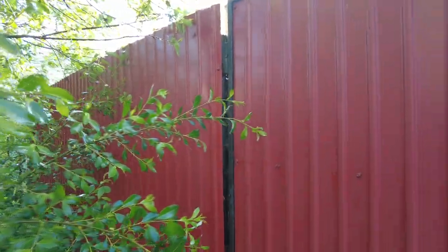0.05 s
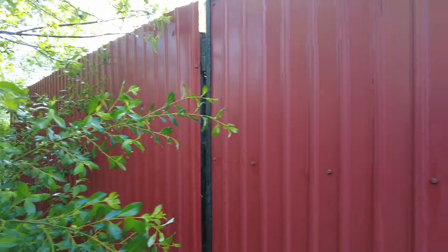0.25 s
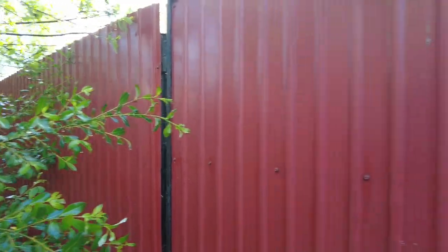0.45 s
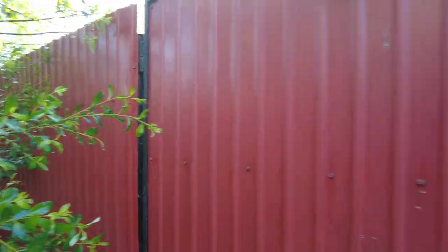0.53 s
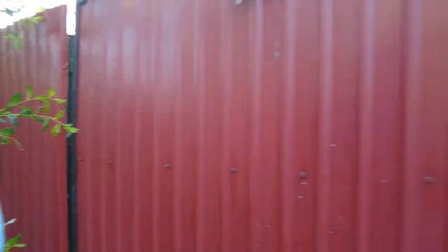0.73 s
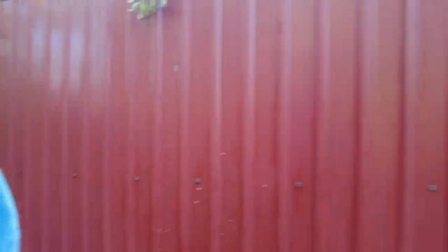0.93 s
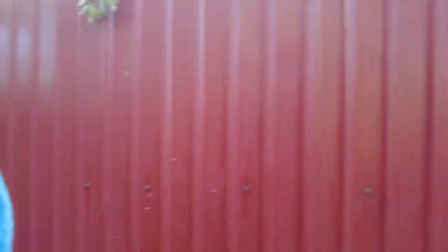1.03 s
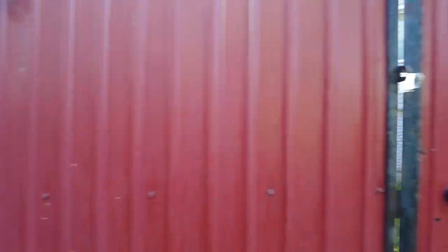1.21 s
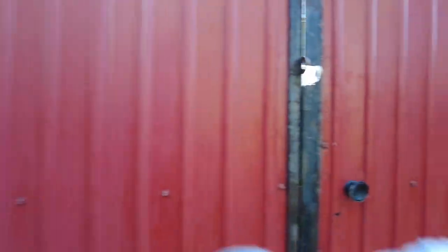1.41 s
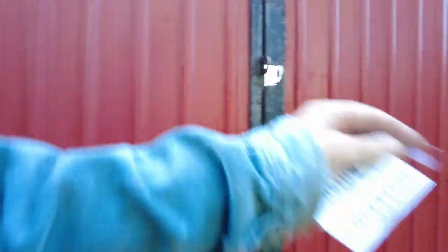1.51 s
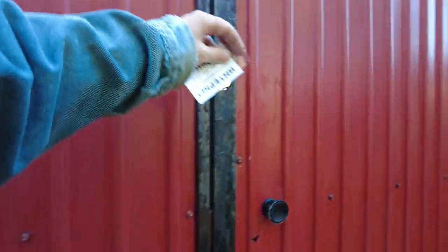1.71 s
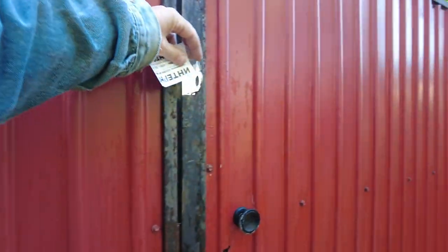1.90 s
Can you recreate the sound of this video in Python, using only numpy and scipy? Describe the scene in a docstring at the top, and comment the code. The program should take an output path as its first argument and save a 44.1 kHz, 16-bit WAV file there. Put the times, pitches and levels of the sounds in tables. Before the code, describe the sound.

A jacket rubs close against a phone microphone in one short rasp, then soft footfalls and gravel clicks

```python
"""A dirt path by a quiet garden: someone walks along it, phone in hand. Something, probably the jacket, catches
close to the right microphone port and slips free in one short rasp of stick-slip hiss, kicks and squeak.
Soft footfalls and bumps (damped thuds), gritty rustling (dense coloured grains) and sharp clicks of gravel
(short resonances) follow. Low noise makes the air that buffets the phone as an arm swings up, and faint
wavering hiss makes the garden."""
import sys
import numpy as np
from scipy import signal
from scipy.fft import rfft, irfft
from scipy.io import wavfile
from scipy.ndimage import uniform_filter1d

SR = 44100
rng = np.random.default_rng(int(sys.argv[2]) if len(sys.argv) > 2 else 0)


def dump_mix(stems):
    """Bounce the given channels to the path in sys.argv[1] as a 16-bit WAV at rate SR."""
    frames = np.atleast_2d(stems).T  # one column per channel
    limited = np.clip(frames, -1, 1)  # hard clip at full scale
    pcm = np.round(limited * 32767).astype(np.int16)
    wavfile.write(sys.argv[1], SR, pcm)


N = 85995

# spectrum of gritty rustle, also the grit on top of each bump: f/Hz, relative level/dB
GRIT_COLOUR = [(300, -10.5), (2300, -6.5), (3000, 1.5), (4400, 0.5), (6000, -2.5), (7200, -5), (10500, -6),
               (13000, -12.5), (16000, -12.5)]


def amp(db):
    """Decibels to gain."""
    return 10 ** (np.asarray(db) / 20)


def unit(x):
    """Scale to rms 1."""
    return x / np.sqrt(np.mean(x ** 2))


def curve(rows):
    """Gain over time, drawn straight in dB through (t/s, level/dB) points."""
    return amp(np.interp(np.arange(N) / SR, *np.array(rows).T))


def gains(points):
    """Gain at each frequency from (f/Hz, level/dB) points, interpolated over log frequency."""
    hz, db = np.array(points).T
    bin_hz = np.arange(N // 2 + 1) * SR / N
    return amp(np.interp(np.log(bin_hz + 1), np.log(hz), db))


def colour(x, points):
    """Give a sound a spectrum, at rms 1."""
    return unit(irfft(rfft(x) * gains(points), N))


def ring(x, hz, width_hz):
    """One damped resonance: a two-pole bandpass."""
    w = 2 * np.pi * min(hz, SR / 2 - 1) / SR
    a = np.sin(w) * width_hz / hz / 2
    return signal.lfilter([a, 0, -a], [1 + a, -2 * np.cos(w), 1 - a], x)


def noise():
    """White noise."""
    return rng.standard_normal(N)


def smooth_twice(x, size):
    """Slow random drift: two moving averages, at rms 1."""
    return unit(uniform_filter1d(uniform_filter1d(x, size=size), size=size))


def grains(spread_db):
    """Dense tiny impacts of random sign and uneven size, whose strength swells in flurries."""
    grains_per_s, flicker_db = 5000, 3.5
    flurry = smooth_twice(noise(), 400)
    size = np.minimum(rng.exponential(size=N), 4)
    hits = rng.random(N) < grains_per_s / SR
    return np.sign(noise()) * hits * amp(spread_db * size + flicker_db * flurry)


def ports(x, scattered, spread):
    """A sound from the right reaches the left port later and duller, its treble partly scattered."""
    # shading of the left port from sounds on the right: f/Hz, level/dB
    shade = [(60, -1.5), (1400, 2.5), (2600, 0), (4400, -9.5), (8100, -11.5), (15000, -26.5)]
    # how late they reach it: f/Hz, delay/s
    port_lag = [(100, .00025), (450, .0006), (1100, .00058), (1350, .00016), (1850, .00016),
                (2200, .000225), (2600, .000195), (6000, .00016)]
    scatter_hz, scatter_edge_hz = 3100, 350
    hz = np.arange(N // 2 + 1) * SR / N
    lag_s = np.interp(hz, *np.array(port_lag).T)
    share = np.clip(spread, 0, 1) * (1 + np.tanh((hz - scatter_hz) / scatter_edge_hz)) / 2
    right = rfft(x)
    # the power stays the same while scattered sound replaces direct sound
    left = np.sqrt(1 - share ** 2) * right + share * rfft(scattered)
    left = left * gains(shade) * np.exp(-2j * np.pi * hz * lag_s)
    return irfft(np.array([left, right]), N)


def rasp():
    """Stick and slip: each slip bursts into rough hiss and kicks the phone's body; a squeak swells midway."""
    # force of the rub: t/s, level/dB
    rub_force = [(.243, -44.5), (.249, -10.5), (.257, -19), (.264, -10.5), (.274, -11.5), (.284, -15),
                 (.298, -21.5), (.305, -25.5), (.315, -44.5), (.35, -70), (.40, -62), (.45, -85)]
    # spectrum of the hiss: f/Hz, relative level/dB
    hiss_colour = [(300, -7.5), (1000, -6), (1650, -3), (1900, -10), (2450, -0.5), (3050, 5), (4400, 3.5),
                   (4850, 0), (5900, 4.5), (6800, -4.5), (8000, 3.5), (9000, 5.5), (11000, 3), (13000, -4),
                   (16000, -1)]
    # response of the phone's body: f/Hz, level/dB
    body_colour = [(40, -23), (100, 4), (175, -0.5), (400, -8.5), (700, 1.5), (850, -0.5), (1000, -6),
                   (1300, 1.5), (1650, 0.5), (2000, -11), (6000, -51)]
    # slips come faster and last longer until they merge
    start_s, gap_s, first_extra_s, extra_share = .2482, .0053, 0.002626, 0.292
    length_s, growth_s, edge_s = .0008, .00056, .0008
    stuck_share, rough_db = .07, 0.6
    kick_db, kick_s = -12.5, 0.00021
    squeak_hz, squeak_width_hz, squeak_s, squeak_length_s, squeak_db = 5930, 350, .2635, 0.0061, 3.5
    body_db, body_peak_s, body_length_s, body_stuck = -24.5, 0.2668, 0.024, 0.42

    t = np.arange(N) / SR
    slipping, kicks = np.zeros(N), np.zeros(N)
    for k in range(16):
        # time inside the slip, negative outside it
        inside_s = np.minimum(t - start_s, start_s + length_s + k * growth_s - t)
        slipping = np.maximum(slipping, (1 + np.tanh(2 * inside_s / edge_s)) / 2)
        kicks -= np.exp(-((t - start_s) / kick_s) ** 2)
        start_s += gap_s + first_extra_s * extra_share ** k

    rough = unit(amp(rough_db * unit(uniform_filter1d(noise(), size=20))))
    force = curve(rub_force) * (slipping + stuck_share) * rough
    squeak = amp(squeak_db) * np.exp(-np.abs(t - squeak_s) / squeak_length_s)
    pressure = np.exp(-((t - body_peak_s) / body_length_s) ** 2)
    body = amp(body_db) * pressure * (body_stuck + slipping)
    thumps = irfft(rfft(amp(kick_db) * pressure * kicks) * gains(body_colour), N)

    def rub():
        """One take on the rub's noise, under the shared slip pattern and kicks."""
        hiss = colour(noise(), hiss_colour)
        hiss = hiss + squeak * unit(ring(noise(), squeak_hz, squeak_width_hz))
        return force * hiss + body * colour(noise(), body_colour) + thumps

    return ports(rub(), rub(), RASP_SPREAD)


def bumps():
    """Soft contacts: a quickly damped thud, a dull crunch around its pitch and a little grit on top."""
    # footfalls and soft bumps: t/s, overall level/dB, pitch f/Hz, decay/s, relative grit level/dB
    contacts = [(0.1102, -32.5, 390, 0.0011, -15.5), (0.2228, -24, 236, 0.0022, -9),
                (0.227, -30.5, 464, 0.0037, -1), (0.302, -32, 129, 0.0057, -25),
                (0.584, -36, 202, 0.0061, -30), (0.721, -38, 480, 0.006, -4.5),
                (0.791, -34.5, 405, 0.0038, -9.5), (0.818, -35, 372, 0.004, -19),
                (0.908, -41, 140, 0.017, -31), (0.936, -38.5, 235.5, 0.012, -3),
                (0.999, -43, 424, 0.0035, -14), (1.1978, -30.5, 448, 0.0023, -7),
                (1.277, -37, 500, 0.0047, -18), (1.3374, -26, 337, 0.0026, -22),
                (1.651, -29, 52.7, 0.015, -50), (1.464, -50, 426, 0.0017, -19),
                (1.582, -34.5, 368, 0.004, -24), (1.649, -37, 52.6, 0.019, -46)]
    attack_s, grit_decay_s = 0.0016, 0.0068
    thud_db, crunch_db = -5, -6
    t, out = np.arange(N) / SR, np.zeros(N)
    for start_s, db, hz, decay_s, grit_db in contacts:
        age = np.maximum(t - start_s, 0)
        rise = 1 - np.exp(-age / attack_s)
        push = rise * np.exp(-age / decay_s)
        thud = np.sin(2 * np.pi * hz * age) * push / push.max()
        width_hz = 2 * hz * 0.74
        # the tiny offset keeps the filter out of denormal numbers
        crunch = ring(ring(noise() * push + 1e-18, hz, width_hz), hz, width_hz)
        crunch = crunch / np.abs(crunch).max()
        grit = colour(noise(), GRIT_COLOUR) * rise * np.exp(-age / grit_decay_s)
        out += amp(db) * (amp(thud_db) * thud + amp(crunch_db) * crunch + amp(grit_db) * grit)
    return ports(out, out * 0, 0)


def clicks():
    """Single snaps with a very short ring, a faint knock and a crumbling tail; the nearer port hears them first."""
    # sharp clicks of grit and small taps:
    # t/s, snap level/dB, pitch f/Hz, width f/Hz, left over right/dB
    snaps = [(.0745, -42, 720, 795, 12), (0.3547, -14, 1880, 1620, 42), (0.3563, -26, 443, 623, 9),
             (0.5917, -33.5, 9000, 12000, -14), (.7205, -36, 5930, 8000, -10),
             (.824, -27.5, 3860, 2760, -8), (0.9156, -21.5, 1820, 1460, 38),
             (0.945, -27.5, 6100, 2500, -11), (.973, -29.5, 6200, 3500, -10),
             (1.032, -20.5, 6200, 8840, -10), (1.1645, -23.5, 4930, 5560, -8),
             (1.386, -20.5, 7200, 10000, -11), (1.3981, -18.5, 6200, 10000, -9),
             (1.466, -26, 2600, 4470, 2), (1.475, -23.5, 3800, 4000, -2), (1.483, -30, 4140, 4030, -6),
             (1.539, -30.5, 1400, 900, 18), (1.6924, -20.5, 4760, 4940, -7), (1.6925, -29.5, 3270, 804, -5),
             (1.6921, -24.5, 1990, 550, 7), (1.7546, -36, 4970, 4950, 14), (1.934, -30, 2200, 3800, 2.5)]
    far_lag_s = .00036
    tail_db, tail_s = -24.5, 0.0035
    knock_db, knock_hz = -28, 480
    t, out = np.arange(N) / SR, np.zeros((2, N))
    for start_s, db, hz, width_hz, pan_db in snaps:
        for channel, side in enumerate((1, -1)):  # left, right
            far = side * pan_db < 0
            at = int(np.clip((start_s + far * far_lag_s) * SR, 0, N - 1))
            blow = 1. * (np.arange(N) == at)
            fade = (t > t[at]) * np.exp(-np.abs(t - t[at]) / tail_s)
            snap = blow + amp(tail_db) * noise() * fade + 1e-18
            for _ in range(3):
                snap = ring(snap, hz, 2 * width_hz)
            knock = ring(ring(blow + 1e-18, knock_hz, knock_hz), knock_hz, knock_hz)
            click = snap / np.abs(snap).max() + amp(knock_db) * knock / np.abs(knock).max()
            out[channel] += amp(db - far * abs(pan_db)) * click
    return out


def rustling():
    """Soles scuff the dirt and clothes rustle as coloured grains; at the end a sleeve swings up on the left."""
    # treble rustle: t/s, level/dB
    rustle_level = [(.2, -79.5), (.31, -49), (.41, -54.5), (.46, -46), (.51, -60), (.595, -55.5),
                    (.625, -42.5), (.70, -53.5), (.79, -56), (.86, -61), (.96, -53), (1.01, -58.5),
                    (1.07, -53.5), (1.22, -65), (1.33, -50), (1.385, -44.5), (1.425, -58), (1.468, -53.5),
                    (1.478, -39), (1.50, -62), (1.7, -60), (1.9, -68)]
    # scuffing: t/s, level/dB
    scuff_level = [(.2, -58), (.39, -56), (.45, -53), (.53, -57.5), (.63, -42), (.70, -53.5), (.78, -48.5),
                   (.84, -51), (.89, -54), (.96, -60), (1.13, -58), (1.25, -52), (1.35, -47), (1.42, -50),
                   (1.46, -44.5), (1.50, -50), (1.66, -59.5), (1.695, -46.5), (1.74, -58), (1.93, -56)]
    # swinging sleeve: t/s, level/dB
    sleeve_level = [(1.5, -94), (1.6, -54), (1.66, -56), (1.71, -50), (1.78, -54.5), (1.86, -64.5),
                    (1.95, -59)]
    # spectra of scuffing and sleeve: f/Hz, relative level/dB
    scuff_colour = [(60, -19), (150, -5), (380, -1), (560, -2.5), (780, 0.5), (1000, -3), (1400, -3.5),
                    (2100, -16), (3000, -6.5), (6000, -40)]
    sleeve_colour = [(500, -37.5), (1800, -1), (3000, 2), (5500, 2), (8000, -8), (12000, -25), (16000, -30)]

    # a direct and a scattered version of each
    fine = [curve(rustle_level) * colour(grains(4), GRIT_COLOUR) for _ in range(2)]
    coarse = [curve(scuff_level) * colour(grains(3), scuff_colour) for _ in range(2)]
    cloth_left, cloth_right = [colour(grains(4.5), sleeve_colour) for _ in range(2)]
    sleeve = curve(sleeve_level) * np.array([cloth_left, amp(-15.5) * cloth_right])
    return ports(*fine, RUSTLE_SPREAD) + ports(*coarse, SCUFF_SPREAD) + sleeve


def outdoors():
    """Low buffeting noise, nearly alike on both ports, over the faint wavering hiss of the garden."""
    # buffeting air: t/s, level/dB
    air_level = [(0, -61.5), (.17, -65), (.225, -43), (.31, -64), (.36, -48.5), (.49, -51), (.55, -57.5),
                 (.73, -50.5), (.95, -52.5), (1.15, -61), (1.3, -60.5), (1.39, -53), (1.5, -51.5),
                 (1.61, -42.5), (1.66, -35.5), (1.72, -45.5), (1.85, -55.5), (1.95, -52)]
    # spectra of air and garden: f/Hz, relative level/dB
    air_colour = [(12, -7.5), (28, -3), (48, 0), (75, -7.5), (120, -12), (220, -34), (600, -50),
                  (2000, -100)]
    garden_colour = [(30, -10), (100, -16), (250, -10), (500, 4.5), (1200, -6), (2000, 0.5), (3200, 0),
                     (5000, -7.5), (9000, -12.5), (16000, -29.5)]
    air_spread, waver_db, garden_db = 0.09, 0.5, -61
    waver = amp(waver_db * smooth_twice(noise(), 1200))
    garden = waver * np.array([colour(noise(), garden_colour) for _ in range(2)])
    mid = colour(noise(), air_colour)
    side = air_spread * colour(noise(), air_colour)
    return curve(air_level) * np.array([mid + side, mid - side]) + amp(garden_db) * garden


# scattered share of the treble at the left port, 0 to 1
RASP_SPREAD, RUSTLE_SPREAD, SCUFF_SPREAD = 0.67, 1, 0.66


def scene():
    """All near sounds, with a faint decaying scatter from the fence and bushes, over the outdoor air."""
    echo_db, echo_decay_s = -27.5, .035
    near = rasp() + bumps() + clicks() + rustling()
    fade = np.exp(-np.arange(SR // 2) / SR / echo_decay_s)
    scatter = rng.standard_normal((2, SR // 2)) * fade
    scatter = scatter / np.sqrt(np.sum(scatter[0] ** 2))
    echo = signal.fftconvolve(near, scatter, axes=1)[:, :N]
    return near + amp(echo_db) * echo + outdoors()


def record(dry):
    """The phone rounds the highest peaks and cuts the top above 16 kHz with a steep lowpass."""
    rounded = 1.1 * np.tanh(dry / 1.1)
    lowpass = signal.ellip(10, .2, 80, 16000, fs=SR, output="sos")
    return signal.sosfilt(lowpass, rounded)


dry = scene()
out = record(dry)
dump_mix(out)
```